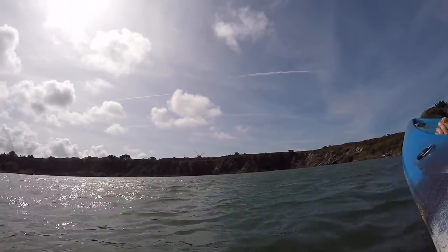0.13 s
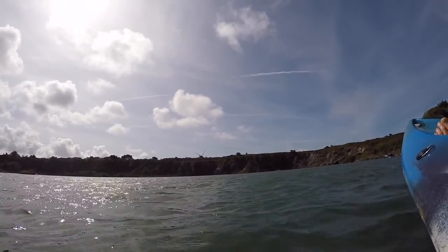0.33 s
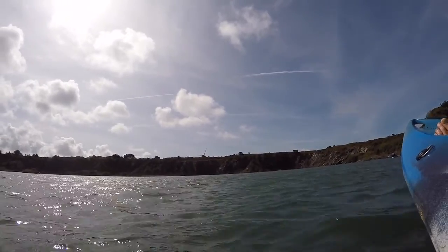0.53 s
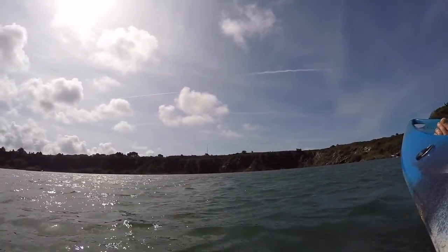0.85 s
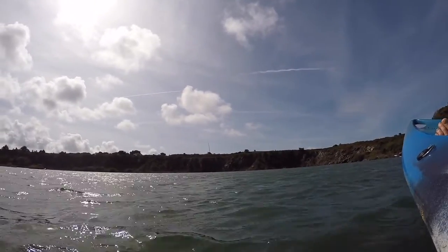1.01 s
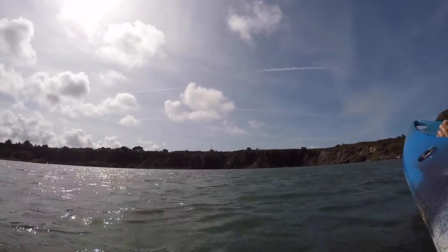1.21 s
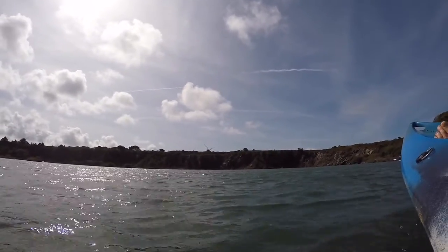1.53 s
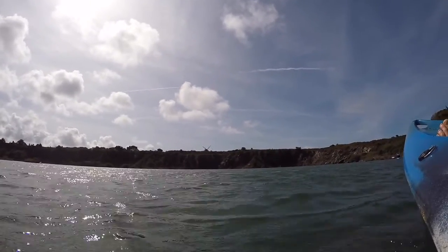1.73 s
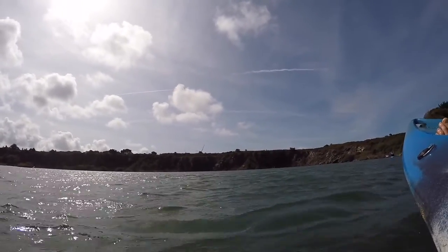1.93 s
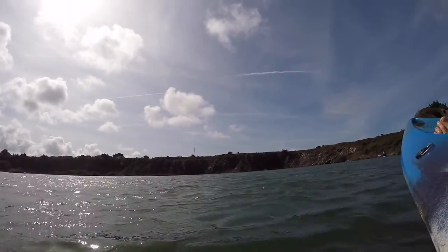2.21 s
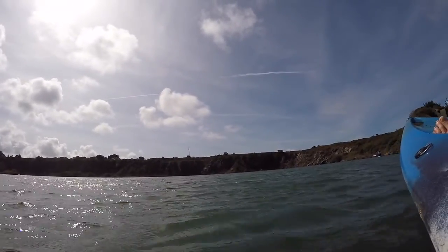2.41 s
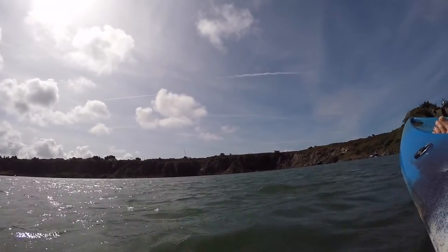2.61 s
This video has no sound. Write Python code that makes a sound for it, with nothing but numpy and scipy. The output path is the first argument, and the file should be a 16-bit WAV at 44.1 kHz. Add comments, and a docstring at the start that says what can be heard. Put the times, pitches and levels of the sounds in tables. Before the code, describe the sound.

Water laps and gurgles at a kayak hull, with low wind rumble and a faint gull.

```python
"""Wind rumbles on the microphone while small waves lap at a kayak, heard from just above the water.
Bubbles plop and ring over a soft wash and a fizz of foam. Early on, one wavelet sprays and slaps
shut on trapped air; then air pockets gulp against the hull, bubbles plop and droplets tick more quietly.
Far off, a gull gives a run of seven yelping notes, each breaking upward and sagging back."""
import sys
import numpy as np
from scipy import signal
from scipy.fft import rfft, irfft
from scipy.io import wavfile
from scipy.ndimage import uniform_filter1d

SR = 44100
rng = np.random.default_rng(int(sys.argv[2]) if len(sys.argv) > 2 else 0)


def bounce(signal):
    """Save signal as a 16-bit WAV file at the path given by the first command-line argument."""
    frames = np.transpose(np.atleast_2d(signal))
    limited = np.clip(frames, -1, 1)
    pcm = np.round(limited * 32767).astype(np.int16)
    wavfile.write(sys.argv[1], SR, pcm)


N = 121275
TIME = np.arange(N) / SR


def from_db(db):
    """Decibels to gain."""
    return 10 ** (np.asarray(db) / 20)


def rms_one(x):
    """Scale to rms 1."""
    return x / np.sqrt(np.mean(x ** 2) + 1e-20)


def pan(db):
    """Constant-power left and right gains; positive db leans left."""
    gains = np.array([from_db(db / 2), from_db(-db / 2)]).reshape(2, -1)
    return gains / np.sqrt(np.mean(gains ** 2, axis=0))


def fader(points):
    """Gain that rides through (time_s, level_db) points."""
    return from_db(np.interp(TIME, *np.transpose(points)))


def band(x, low_hz, high_hz):
    """Gentle band-pass."""
    return signal.sosfilt(signal.butter(2, [low_hz, high_hz], "band", fs=SR, output="sos"), x + 1e-18)


def drift(per_s):
    """Random wander with per_s turning points a second; rms 1."""
    return rms_one(np.interp(TIME * per_s, np.arange(2000), rng.standard_normal(2000)))


def noise(spectrum, correlation):
    """Stereo noise with a given EQ curve and left-right correlation; rms 1."""
    hz, db = np.transpose(spectrum)
    freqs = np.maximum(np.arange(N // 2 + 1) * SR / N, 1)
    eq = from_db(np.interp(np.log(freqs), np.log(hz), db))
    roll_off = np.minimum(freqs / hz[0], 1) ** 2 * np.minimum(hz[-1] / freqs, 1) ** 2
    mid, side = irfft(rfft(rng.standard_normal((2, N))) * eq * roll_off, N)
    return rms_one(np.sqrt(1 + correlation) * mid + np.sqrt(1 - correlation) * side * [[1], [-1]])


def clicks(per_s, spread_db):
    """Random stereo clicks of uneven size, each from its own direction."""
    born = rng.random(N) < per_s / SR
    size = from_db(spread_db * np.minimum(rng.exponential(1, N), 4)) * rng.choice([-1, 1], N)
    return born * size * pan(rng.normal(0, 21, N))


def tiny_bubbles(per_s, low_hz, high_hz, t60_cycles, spread_db, tilt_db_per_octave, pitches):
    """A swarm of tiny bubbles: each click excites one short resonance that swells and fades; rms 1."""
    pops = clicks(per_s, spread_db)
    pitch_index = rng.integers(0, pitches, N)
    pops *= np.where(rng.random((2, N)) < .2, -1, 1)   # polarity flips widen the image
    out = 0
    for k, hz in enumerate(np.geomspace(low_hz, high_hz, pitches)):
        r = from_db(-60 * hz / (t60_cycles * SR))   # decay per sample
        resonator = [(1 - r * r) / 2, 0, (r * r - 1) / 2, 1, -2 * r * np.cos(2 * np.pi * hz / SR), r * r]
        ring = signal.sosfilt([resonator, resonator], pops * (pitch_index == k) + 1e-18) / (1 - r)
        out += ring * from_db(tilt_db_per_octave * np.log2(hz / low_hz))
    return rms_one(out)


def scatter(x, decay_s, wet):
    """Add brief reflections off ripples and hull, different at each ear."""
    t = TIME[:SR // 20]
    tails = rng.standard_normal((2, len(t))) * np.exp(-t / decay_s)
    tails /= np.sqrt(np.sum(tails ** 2, axis=1, keepdims=True))
    return x + wet * signal.fftconvolve(x.mean(axis=0)[None], tails, axes=1)[:, :N]


# Gusts on the microphone: time_s, level_db (before trim), pan_db
GUSTS = [(0.0, -40.5, -6.5), (0.331, -41.5, 14.5), (0.35, -31.5, 14), (0.46, -45.5, 4), (0.53, -36, 19),
         (0.67, -37.5, -11), (0.77, -43, 4.5), (0.91, -33, -17.5), (1.03, -42.5, 1), (1.12, -38, -6.5),
         (1.51, -40, -4.5), (1.54, -36.5, -42), (1.79, -44.5, -18), (2.15, -38, -6), (2.2, -36.5, -18),
         (2.38, -44.5, -4), (2.43, -39, -13), (2.75, -47.5, -15)]
# EQ of the deep buffeting: freq_hz, gain_db
BUFFET_EQ = [(15, -14.5), (28, 1), (42, -5.5), (60, -12), (80, -29.5), (120, -36.5)]
# Fader ride of the wind's upper flutter: time_s, level_db (before trim)
FLUTTER_RIDE = [(0.0, -51), (0.33, -55), (0.35, -51.5), (1.05, -44), (1.31, -53), (1.36, -38.5),
                (1.42, -53.5), (1.45, -43), (1.72, -54.5), (2.21, -45), (2.26, -55.5), (2.59, -59),
                (2.68, -47), (2.75, -66)]
# EQ of the flutter: freq_hz, gain_db
FLUTTER_EQ = [(55, -13), (80, -0.5), (110, -10.5), (160, -23.5), (250, -25.5), (500, -50)]


def wind(buffet_trim_db=7, flutter_trim_db=2.5):
    """Air buffets each microphone port separately: a deep rumble with a lighter flutter above it."""
    time_s, level_db, pan_db = np.transpose(GUSTS)
    air = noise(BUFFET_EQ, correlation=0.056)
    air /= np.sqrt(uniform_filter1d(air ** 2, size=4000, axis=1) + 0.17)   # compress so the gusts lead
    gust_gain = from_db(buffet_trim_db + np.interp(TIME, time_s, level_db))
    buffet = air * gust_gain * pan(np.interp(TIME, time_s, pan_db))
    flutter = noise(FLUTTER_EQ, correlation=.1) * fader(FLUTTER_RIDE) * from_db(flutter_trim_db)
    return buffet + flutter * pan(-7)


# Fader ride of the ripples stirring all round: time_s, level_db (before trim)
RIPPLE_RIDE = [(0.0, -58.5), (0.47, -58), (0.56, -58), (0.93, -63), (1.05, -61), (1.17, -61.5),
               (1.55, -61.5), (1.67, -63.5), (1.78, -61), (2.18, -63.5), (2.48, -59.5), (2.75, -61)]
# EQ of the far wash: freq_hz, gain_db
WASH_EQ = [(150, 7.5), (300, -2), (600, -5.5), (1300, -7), (2000, -13), (3200, -16)]


def ripples(wash_trim_db=1.5, gurgle_trim_db=-5):
    """Small ripples make a smooth far wash and a nearer gurgle of tiny bubbles."""
    wash = from_db(wash_trim_db + drift(25.27)) * noise(WASH_EQ, correlation=0.028)
    gurgle = tiny_bubbles(per_s=170, low_hz=297.3, high_hz=2272, t60_cycles=29.5,
                          spread_db=1.5, tilt_db_per_octave=1.25, pitches=28)
    return fader(RIPPLE_RIDE) * (wash + from_db(gurgle_trim_db) * gurgle)


# Fader ride of the foam, swelling and ebbing with the laps: time_s, level_db (before trim)
FOAM_RIDE = [(0.0, -71), (0.35, -70.5), (0.76, -74), (1.72, -70.5), (1.95, -74), (2.34, -75), (2.49, -68),
             (2.75, -74.5)]
# EQ of the foam's hiss: freq_hz, gain_db
HISS_EQ = [(3600, -0.5), (8000, 0), (12000, -4), (16000, -9)]


def foam(hiss_trim_db=1, fizz_trim_db=2):
    """Bursting foam fizzes over a fine hiss."""
    hiss = from_db(hiss_trim_db) * noise(HISS_EQ, correlation=0.028)
    fizz = tiny_bubbles(per_s=800, low_hz=1690, high_hz=15500, t60_cycles=12,
                        spread_db=2, tilt_db_per_octave=0.8, pitches=30)
    return fader(FOAM_RIDE) * (hiss + from_db(fizz_trim_db) * fizz)


# Bubbles ringing at the surface: start_s, pitch_hz, level_db (before trim), pan_db, t60_s
PLOPS = [(.004, 732, -51.5, 27, 0.17), (0.071, 2320, -60, -4, 0.045), (.086, 1444, -58, 0, 0.04),
         (0.116, 2480, -55, -8, 0.016), (0.128, 242, -52.5, 2, 0.03), (.208, 970, -53, 1, 0.031),
         (.144, 650, -51, 0, 0.023), (0.166, 2810, -56.5, -9, 0.02), (0.19, 365.6, -54, -4, 0.18),
         (0.289, 2870, -53.5, -6, 0.011), (0.297, 4560, -51.5, -4, 0.023), (0.367, 1076, -49.5, -4, 0.026),
         (0.401, 2940, -53, -16, .012), (.499, 674, -54.5, -3, 0.12), (0.55, 1320, -52, -11, 0.017),
         (.575, 819, -53.5, -2, 0.079), (0.574, 1710, -54, -15, .022), (0.598, 1800, -62, -13, 0.018),
         (0.61, 2450, -58, -13, 0.027), (0.64, 924, -55, -1, .02), (0.705, 2500, -63, -18, 0.014),
         (0.793, 1410, -49.5, 10, 0.0085), (.806, 890, -57.5, -5, 0.085), (.827, 3320, -47.5, -13, 0.018),
         (0.865, 1326, -52, -7, 0.033), (.936, 857, -52.5, -8, 0.078), (0.9665, 807, -46.5, 4, 0.015),
         (1.073, 496, -58, -11, 0.059), (1.139, 4400, -53.5, -5, 0.01), (1.146, 788, -51.5, 1, 0.075),
         (1.166, 864, -53, -2, 0.028), (1.174, 2430, -62, -14, 0.036), (1.286, 1160, -51, -21, 0.015),
         (1.298, 374, -51.5, -5, 0.055), (1.481, 784, -61, 10, 0.018), (1.543, 823, -51.5, 1, 0.03),
         (1.590, 753, -54.5, 10, 0.076), (1.743, 1130, -54.5, -12, 0.025), (1.9375, 1450, -48.5, -9, 0.017),
         (1.939, 2730, -56, 1, 0.0096), (2.046, 2370, -57.5, -7, 0.0092), (2.2792, 5730, -54.5, -3, 0.019),
         (2.312, 1024, -58.5, -4, 0.034), (2.371, 2855, -51, -22, 0.01), (2.492, 760, -49.5, 4, 0.03),
         (2.501, 527, -54.5, -2, .035), (2.536, 1020, -53, -2, 0.022), (2.596, 1105, -57, 2, 0.021)]


def bubbles(trim_db=3.5, rise=0.16, wobble=.03, attack_cycles=2.9, rough_db=2,
            plip_db=-5, plip_decay_s=0.0031, port_lag_s=0.00069):
    """Each bubble opens with a wet plip, swells in a few cycles and rings down, wobbling up in pitch."""
    out = np.zeros((2, N))
    for start_s, pitch_hz, level_db, pan_db, t60_s in PLOPS:
        start = int(start_s * SR)
        t = TIME[:min(SR // 5, N - start)]
        hz = pitch_hz * (1 + rise * np.minimum(t / t60_s, 1) + wobble * drift(250)[:len(t)])
        phase = 2 * np.pi * np.cumsum(hz) / SR
        # the ring reaches one port first, by at most a quarter cycle
        shift = min(np.pi * pitch_hz * port_lag_s, np.pi / 4) * rng.choice([-1, 1])
        envelope = (1 - np.exp(-(t * pitch_hz / attack_cycles) ** 2)) * from_db(-60 * t / t60_s)
        burst = band(rng.standard_normal((2, SR // 5)), pitch_hz / 2 ** .5, pitch_hz * 2 ** .25)
        plip = rms_one(burst)[:, :len(t)] * np.exp(-t / plip_decay_s)
        roughness = from_db(rough_db * drift(200)[:len(t)])
        ring = envelope / envelope.max() * roughness * np.sin([phase + shift, phase - shift])
        plop = ring + from_db(plip_db) * plip
        out[:, start:start + len(t)] += from_db(level_db + trim_db) * plop * pan(pan_db)
    return out


# Wavelets breaking on the hull: start_s, attack_s, decay_s, low_hz, high_hz, level_db, pan_db
WAVELETS = [(0.282, 0.0069, 0.011, 2820, 8900, -54, -12), (0.422, 0.015, 0.013, 5400, 13800, -48.5, -4.5),
            (0.429, 0.0072, 0.039, 220, 2970, -49.5, -15), (0.447, 0.0042, 0.013, 1720, 4960, -54.5, 0),
            (0.474, 0.0089, 0.011, 397, 1920, -48, -7), (.54, 0.011, 0.03, 1200, 4700, -64, -14),
            (.11, 0.018, 0.079, 700, 3970, -64, 15), (.93, 0.013, 0.042, 1500, 4440, -58.5, -1),
            (1.514, 0.0037, 0.087, 620, 1900, -57, -5), (2.14, 0.0078, 0.064, 900, 1820, -60.5, 6),
            (2.155, 0.0089, 0.015, 4960, 12700, -65.5, 11), (1.455, 0.0088, 0.025, 2960, 10400, -61, -6),
            (1.914, 0.021, 0.022, 1180, 4300, -57.5, -4), (2.485, 0.042, 0.026, 1500, 11500, -62.5, 10),
            (2.49, 0.017, 0.092, 445, 1080, -68, -3)]


def splashes():
    """A breaking wavelet throws dense grains of spray that swell quickly and die away."""
    out = 0
    for start_s, attack_s, decay_s, low_hz, high_hz, level_db, pan_db in WAVELETS:
        t = TIME - start_s
        envelope = np.clip(t / attack_s, 0, 1) ** 2 * np.exp(-np.maximum(t - attack_s, 0) / decay_s)
        grains = clicks(per_s=9900, spread_db=1.5) * rng.choice([-1, 1], (2, N))
        spray = rms_one(band(grains, low_hz, high_hz))
        out += from_db(level_db) * envelope * spray * pan(pan_db)
    return out


# The gull's yelps: upward_break_s, high_part_s, level_db, lead_in_db (relative to level_db)
YELPS = [(.226, .034, -63, -6), (.553, .033, -62, -5), (.88, .034, -61, -9), (1.214, .035, -61.5, -8),
         (1.524, .07, -61, -10), (1.858, .118, -64, -25), (2.325, .125, -66, -20)]
# Tone of its voice, fundamental first: harmonic_db
GULL_TONE = [0, -18, -4]


def gull(lead_hz=1265, top_hz=1500, sag_hz=1317, tail_hz=1198, droop_hz=63.6, cutoff_hz=3650,
         lead_s=0.1, jump_s=0.0055, tail_s=0.038, swell_db=2.5, rough_db=2.6):
    """Each yelp leads in softly, breaks upward, swells as it sags and drops away; distance dulls it."""
    out = 0
    waver = 1 + .014 * drift(200)
    for upward_break_s, high_part_s, level_db, lead_in_db in YELPS:
        t = TIME - upward_break_s
        end_s = high_part_s + jump_s + tail_s
        hz = np.interp(t, [-jump_s, 0, high_part_s / 2, high_part_s, high_part_s + jump_s, end_s],
                       [lead_hz, top_hz, top_hz - droop_hz, sag_hz, tail_hz, tail_hz - droop_hz])
        gate = np.clip((t + lead_s) / 0.03, 0, 1) * np.clip((end_s - t) / 0.028, 0, 1)
        gain = from_db(level_db + np.interp(t, [-jump_s, 0, high_part_s], [lead_in_db, -swell_db, 0]))
        phase = 2 * np.pi * np.cumsum(hz * waver) / SR
        for k, harmonic_db in enumerate(GULL_TONE, 1):
            high_cut = 1 / (1 + (k * hz / cutoff_hz) ** 20)
            out += gate * gain * from_db(harmonic_db) * high_cut * np.sin(k * phase)
    return out * from_db(rough_db * drift(200)) * pan(-5)


# Droplets landing: start_s, level_db (before trim and filter), pan_db, low_hz, high_hz
TICKS = [(0.291, -45.5, 15, 6550, 8900), (0.4017, -45, -16, 5000, 15000), (.4042, -42.5, -4, 5500, 14500),
         (1.2679, -43, -4, 4500, 12300), (1.469, -50, -7, 7000, 13000), (1.482, -59, -10, 5000, 14000),
         (1.703, -57, 1, 6000, 14000), (1.774, -54.5, -6, 6000, 14000), (1.816, -47.5, 0, 3980, 9800),
         (2.163, -50, 6, 5500, 7500), (2.467, -46.5, 13, 8460, 15500), (2.622, -49.5, 0, 8500, 15500),
         (2.6565, -43.5, -1, 7700, 10600)]


def droplets(trim_db=3, decay_s=.0013):
    """Each droplet lands with a very short, bright tick of its own colour, different at each ear."""
    out = 0
    for start_s, level_db, pan_db, low_hz, high_hz in TICKS:
        envelope = (TIME >= start_s) * np.exp(-abs(TIME - start_s) / decay_s)
        tick = band(envelope * rng.standard_normal((2, N)), low_hz, high_hz)
        out += from_db(level_db + trim_db) * tick * pan(pan_db)
    return out


# Water slapping shut on small pockets of air: start_s, pitch_hz, level_db, pan_db, t60_s
SLAP_HITS = [(.4355, 1800, -39, -10, .016), (0.4408, 1500, -42, -2, 0.017), (0.448, 2700, -43, -15, 0.0072),
             (.4503, 2480, -35.5, -21, 0.005), (0.4662, 2740, -47, -19, 0.0067),
             (.487, 1000, -41, -16, 0.01), (.4962, 800, -37.5, -8, 0.0083), (0.63, 2620, -45, -15, 0.018),
             (0.7818, 1140, -45.5, -17, 0.017), (1.389, 1130, -48.5, -2, 0.022),
             (1.9276, 1570, -46.5, -4, 0.011), (1.935, 1500, -44, 5, .018), (1.9435, 2430, -63, -3, 0.011),
             (1.9464, 3040, -52.5, -2, 0.0069), (2.3733, 3600, -48, -11, 0.0084),
             (2.492, 2400, -54, -6, 0.012), (2.525, 2450, -53, 2, 0.015)]


def slaps(crack_db=-7, crack_decay_s=.0013):
    """Water closes with a hard, broad crack, and the trapped air rings briefly."""
    out = np.zeros((2, N))
    t = TIME[:SR // 20]
    for start_s, pitch_hz, level_db, pan_db, t60_s in SLAP_HITS:
        ring = np.sin(2 * np.pi * pitch_hz * t) * from_db(-60 * t / t60_s)
        burst = rms_one(band(rng.standard_normal((2, len(t))), pitch_hz / 2, 2 * pitch_hz))
        crack = from_db(crack_db) * burst * np.exp(-t / crack_decay_s)
        start = int(start_s * SR)
        out[:, start:start + len(t)] += from_db(level_db) * (ring + crack) * pan(pan_db)
    return out


# Air squeezed between water and hull: start_s, length_s, first_hz, last_hz, level_db
AIR_POCKETS = [(0.472, 0.0298, 270, 529, -48.5), (0.957, 0.029, 150.8, 212, -54.5),
               (1.871, 0.06, 350, 513, -58.5), (2.223, .088, 174.6, 663, -50)]


def gulps(wobble=.11, roughness=.6):
    """A shrinking air pocket glides upward, wobbling in pitch and strength."""
    out = 0
    for start_s, length_s, first_hz, last_hz, level_db in AIR_POCKETS:
        progress = np.clip((TIME - start_s) / length_s, 0, 1)
        hz = first_hz * (last_hz / first_hz) ** progress * (1 + wobble * drift(300))
        arch = np.sqrt(4 * progress * (1 - progress))
        strength = 1 + roughness * np.array([drift(250), drift(250)])
        out += from_db(level_db) * arch * strength * np.sin(2 * np.pi * np.cumsum(hz) / SR)
    return out * pan(-1)


def scene():
    """Water and gull over a bed of ripples, foam and wind; the closest sounds arrive almost dry."""
    near = scatter(bubbles() + gulps() + splashes(), decay_s=0.015, wet=.42)
    closest = scatter(slaps() + droplets(), decay_s=0.0091, wet=.3)
    far = scatter(gull(), decay_s=0.0041, wet=.42)
    return near + closest + far + ripples() + foam() + wind()


def record(dry):
    """A steep high cut on the whole mix."""
    cutoff_hz = 15900
    return signal.sosfilt(signal.ellip(10, .2, 70, cutoff_hz, fs=SR, output="sos"), dry)


dry = scene()
out = record(dry)
bounce(out)
```